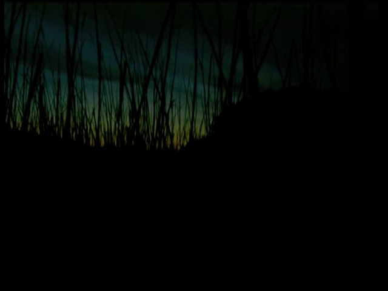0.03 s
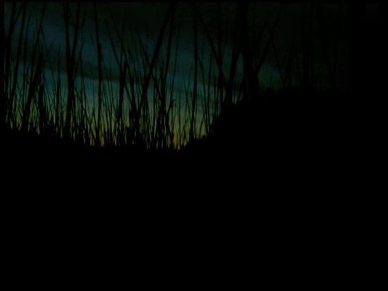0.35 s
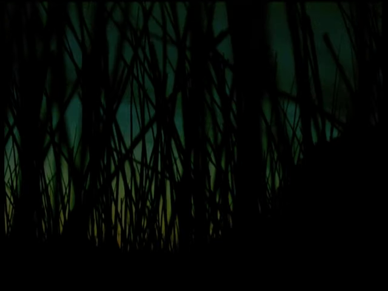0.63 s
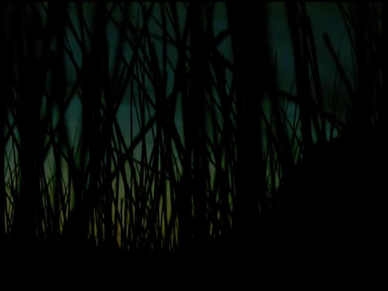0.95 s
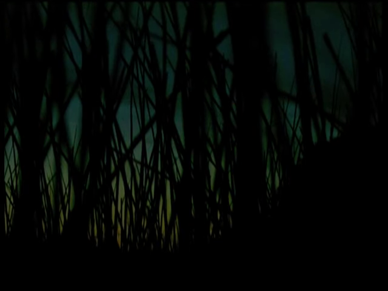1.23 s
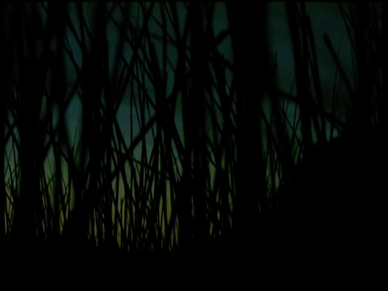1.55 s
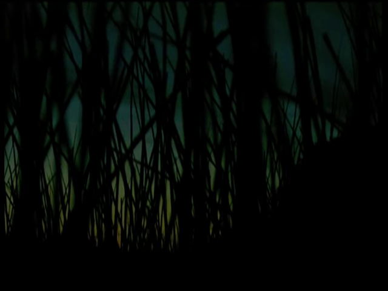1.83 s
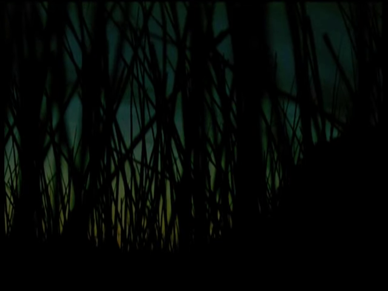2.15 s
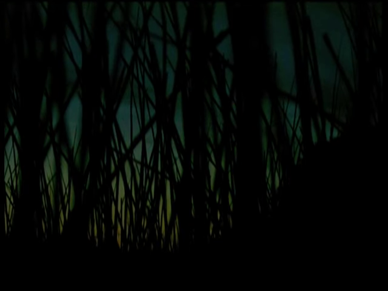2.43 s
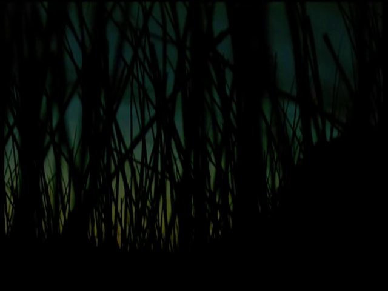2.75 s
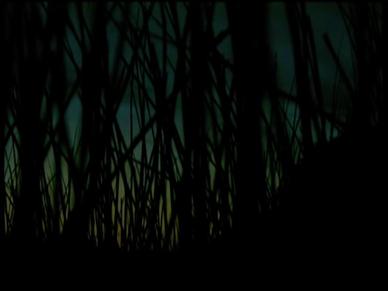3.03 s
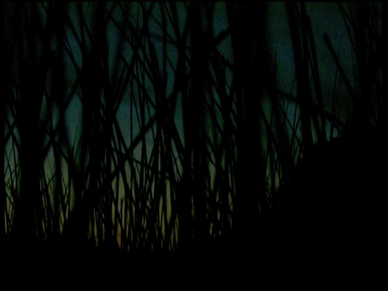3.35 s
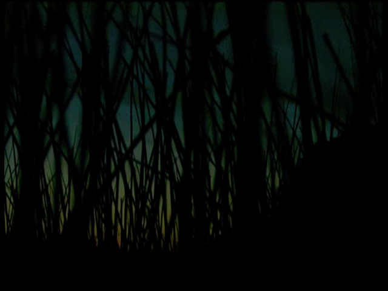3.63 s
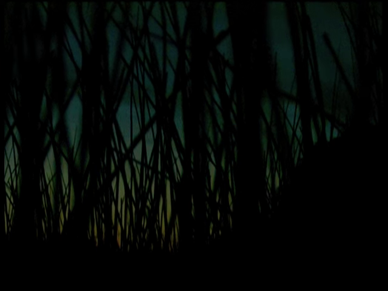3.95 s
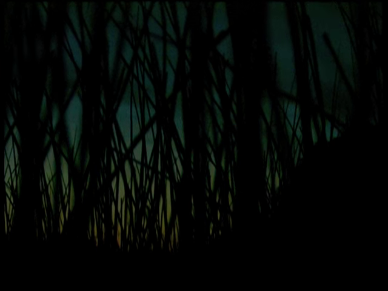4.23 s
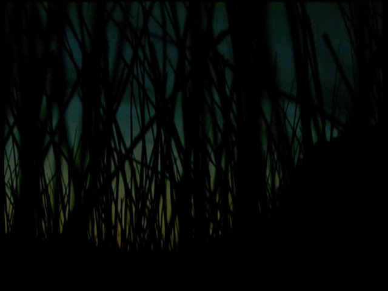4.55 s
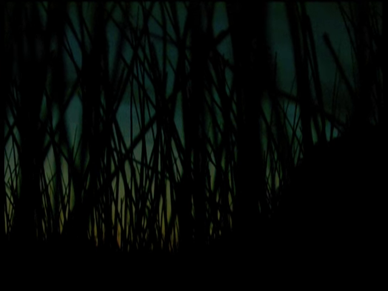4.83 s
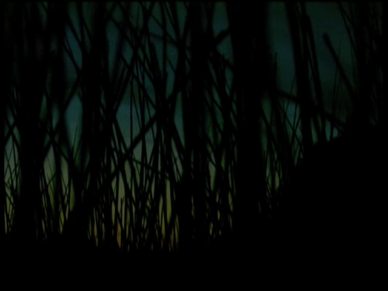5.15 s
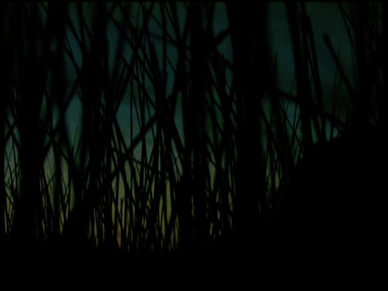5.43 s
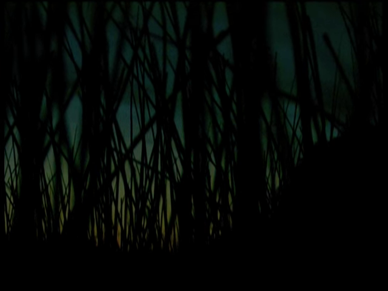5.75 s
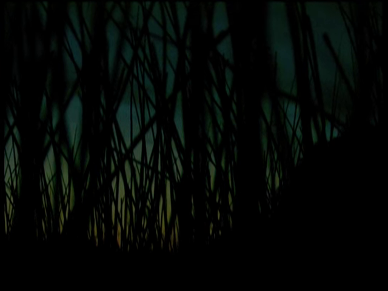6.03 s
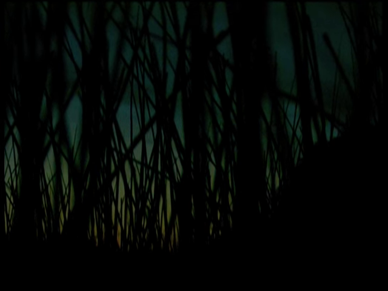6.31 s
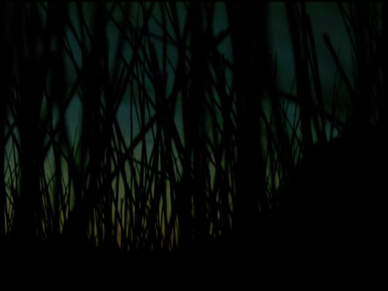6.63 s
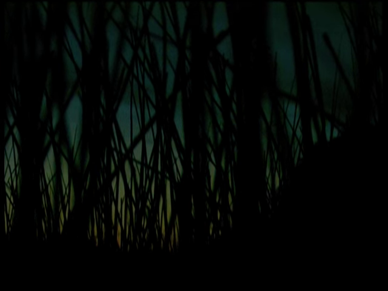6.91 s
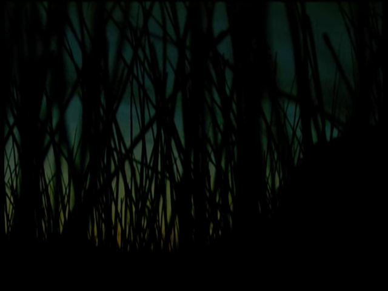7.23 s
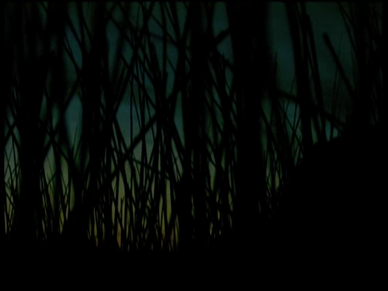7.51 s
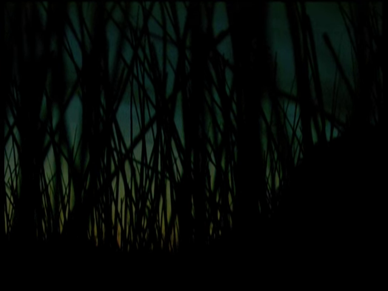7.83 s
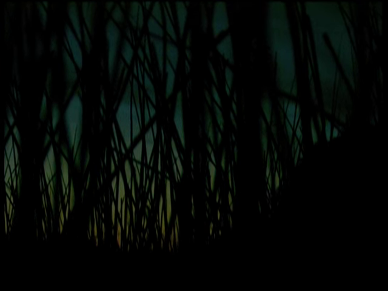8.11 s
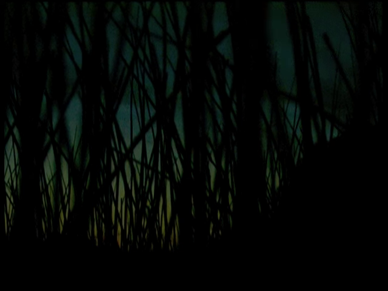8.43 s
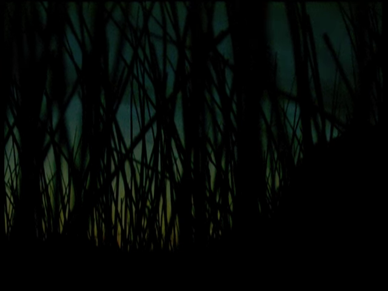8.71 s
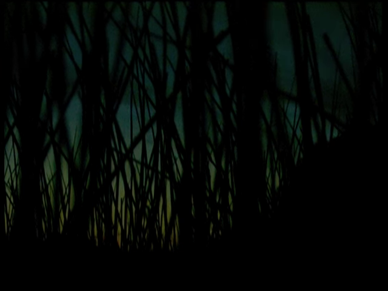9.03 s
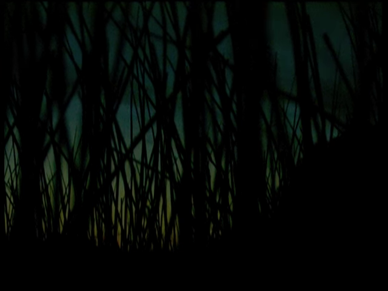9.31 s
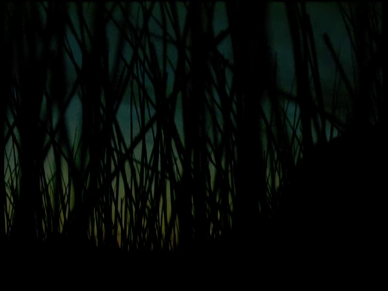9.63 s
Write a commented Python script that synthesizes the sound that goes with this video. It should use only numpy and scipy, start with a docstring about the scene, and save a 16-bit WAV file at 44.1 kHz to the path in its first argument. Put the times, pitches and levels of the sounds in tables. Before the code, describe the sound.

In a reed bed at dusk, a small warbler sings a high, fast, buzzing trill close to the microphone. It breaks off briefly after about a second, then restarts and runs on steadily. Far birds chirp and chatter faintly, a falling whistle comes twice, and a distant waterbird wails past the middle. A soft marsh hush and light hiss lie underneath, with nearly everything on the left.

```python
"""A reed bed at dusk, on the left channel: marsh hush, a fading rumble, recorder hiss, hum and whine.
At once a close warbler reels, 23 syllables a second, each a soft tick, an upward flick and a falling
note, scattered by the thicket. Far birds chirp, then chatter nasally. The warbler stops at 1.2 s and
restarts softly at 1.6 s. A far whistle slurs down at 2.8 s, a waterbird wails from 5.8 s to 7 s,
and the whistle returns at 7.7 s. The reel runs on to the end."""
import sys
import numpy as np
from scipy import signal
from scipy.fft import rfft, irfft, next_fast_len
from scipy.io import wavfile

SR = 44100
rng = np.random.default_rng(int(sys.argv[2]) if len(sys.argv) > 2 else 0)


def wav_record(signal):
    """Record a signal, one row per channel, as 16-bit PCM in the file named by sys.argv[1]."""
    frames = np.transpose(np.atleast_2d(signal))
    bounded = np.clip(frames, -1, 1)
    # unit amplitude maps onto the largest positive 16-bit level
    quanta = np.round(bounded * 32767).astype(np.int16)
    wavfile.write(sys.argv[1], SR, quanta)


N = 435266

# evening air: freq_hz, density_db
AIR_SPECTRUM = [(25, -5), (60, -7.5), (120, -9), (220, -2.5), (340, 2), (520, -7.5), (900, -10.5),
                (1700, -15), (3500, -17.5), (6000, -15.5), (9500, -27.5), (12000, -21), (16500, -21.5)]
# far rumble: freq_hz, density_db
RUMBLE_SPECTRUM = [(25, -12), (60, -31), (85, 4.5), (110, -16), (270, 0.5), (420, -28.5), (2000, -60)]
# its fade: time_s, level_db
RUMBLE_FADE = [(0, -58.5), (.25, -54), (.45, -62.5), (2, -62), (2.6, -65), (9.87, -80)]

# warbler bouts: start_s, end_s, from_rest_flag
BOUTS = [(0.0168, 1.24, 0), (1.603, 9.87, 1)]
# reel pace: time_s, syllables_per_s
TEMPO = [(0, 23.023), (1.2, 23.482), (2.4, 23.703), (3.8, 23.366), (4.3, 23.538), (5.3, 23.473),
         (7.5, 23.371), (8.8, 23.096), (9.05, 23.4)]
# tiny extra waits in the reel: time_s, extra_wait_s
EXTRA_WAITS = [(.45, .0004), (3.56, .002), (7.86, .0024)]
# reel loudness and pitch, both jump up near 0.44 s: time_s, flick_db, fall_db, pitch_hz
REEL_CONTOUR = [(.41, -17, -16, 5560), (.445, -10.8, -9, 5745), (1.23, -10.5, -10.4, 5697),
                (2.9, -11, -9.5, 5750), (3.7, -10, -9.6, 5730), (5.1, -10, -7.5, 5707),
                (7.5, -10, -7.5, 5688), (7.95, -10.5, -8.5, 5730), (8.4, -9.5, -9, 5695)]
# the three notes of a syllable: offset_ms, pitch_ratio, gain_db
TICK_SHAPE = [(-7, 0.14, -49), (-6.5, 0.27, -28), (-6, 0.45, -22), (-5.5, 0.65, -27.5), (-5.35, 0.89, -21),
              (-4, 0.917, -19.5), (-2.5, 1.38, -36)]
FLICK_SHAPE = [(-0.8439, 0.15, -27.5), (-0.5864, 0.23, -26.5), (-0.3042, 0.68, -20), (-0.23, 0.89, -11),
               (0, 0.9, -4.5), (0.4238, 1.126, 2), (0.99, 1.1535, -5), (1.72, 1.367, -13.5),
               (2.5, 1.507, -18), (3, 1.487, -24.5)]
FALL_SHAPE = [(12.3, 1.05, -56), (13.2, 1.0056, -13.5), (13.53, 1.022, -1.5), (14.7, 1.014, -0.1),
              (15.77, 0.984, -1.5), (16.48, 0.9416, -8.5), (19.33, 0.9004, -13.5), (21.1, 0.9, -37)]
# brief fixed reflections, probably in the microphone's dish: delay_ms, gain
EARLY_ECHOES = [(1.15, -0.035), (2.9, -0.091), (4.15, -0.00001)]
# thicket scatter, strongest in the treble: freq_hz, gain_db
THICKET_RESPONSE = [(1000, -5.5), (3500, -11.5), (5200, -13.5), (6100, -9.5), (7000, -2.5), (9000, -2.5),
                    (11000, -1.5), (13200, 1.5), (15000, -8)]

# far chirps: start_s, length_s, mid_pitch_hz, droop_ratio, level_db
CHIRPS = [(0.044, 0.077, 3020, 0.22, -50), (1.575, 0.067, 2850, 0.075, -54.5),
          (1.68, 0.077, 2890, 0.125, -56), (2.149, .07, 3430, -.04, -55), (3.689, 0.066, 2540, -0.011, -50),
          (3.733, 0.042, 2090, .1, -53), (3.916, .047, 2690, -0.025, -49), (4.143, 0.0406, 2650, 0, -47.5),
          (4.326, 0.048, 2050, 0.095, -53.5), (4.382, 0.032, 2400, 0.0024, -51),
          (4.445, 0.0265, 2400, .03, -48), (4.633, 0.025, 2350, 0.037, -47.5),
          (4.697, .033, 2410, .05, -48), (5.959, .041, 2750, 0.0042, -51), (7.11, .06, 3530, -0.0077, -51),
          (7.186, 0.031, 3300, -.28, -49), (9.407, 0.057, 2440, -.03, -50), (9.65, 0.056, 2880, .1, -50)]
# far chatter: start_s, end_s, level_db
CHATTER_SPELLS = [(0.665, 1.1, -56.5), (1.75, 2.35, -57.5), (3.194, 3.8, -56), (4.111, 5.6, -61.5),
                  (6.099, 7.65, -56), (8.459, 9.85, -56)]
# far nasal calls: start_s, length_s, start_hz, end_hz, level_db, jitter_ratio
NASAL_CALLS = [(1.447, .045, 734, 675, -52, .008), (1.508, 0.041, 730, 667, -54, .012),
               (8.005, 0.062, 802, 642.4, -45.5, 0.052), (8.76, 0.1, 736.3, 700, -56, .03),
               (9.44, 0.0673, 596.6, 567, -53, 0.037)]
# slurred whistle: offset_s, pitch_hz, gain_db
SLUR_SHAPE = [(0, 4400, 8), (.026, 3765, 1.5), (.055, 4130, -3), (.085, 3690, -2), (.11, 3200, -6),
              (.15, 2780, -12)]
# its entries: start_s, level_db
SLURS = [(2.752, -40.5), (7.695, -39.5)]
# waterbird notes: start_s, length_s, mid_pitch_hz, droop_ratio, arch_ratio, level_db, rough_ratio
WAILS = [(5.8, 0.0815, 502, -0.123, .03, -46.5, 0.71), (5.84, .2, 958, .15, .03, -44.5, 1),
         (5.99, 0.158, 1006, .04, 0.099, -41.5, 0.4), (6.13, 0.24, 750, .04, 0, -52, .45),
         (6.3, 0.26, 708.5, .05, .01, -43, .12), (6.618, .16, 680, 0, 0.0298, -48.5, .25),
         (6.76, 0.1, 521, .18, -.1, -56, 0.45), (6.87, 0.16, 694, -.14, 0.078, -46, 0.24)]

# microphone colour: freq_hz, gain_db
MIC_RESPONSE = [(30, 1), (100, -0.5), (800, 0), (1250, 2.5), (1700, -1), (2200, 1.5), (2800, 1.5),
                (3400, -1), (4100, 1), (6500, 0), (8800, 0), (9600, -2.5), (11500, -3.5), (13200, 0),
                (15000, 2)]
# recorder hiss: freq_hz, density_db
HISS_SPECTRUM = [(25, 12), (150, -3), (1000, -1.5), (8000, -3), (12000, -1), (13400, 3.5), (14500, -5),
                 (16500, -27)]
# recorder hum and whine: freq_hz, width_hz, left_db, right_db
RECORDER_TONES = [(149.8, 2, -66.5, -100), (13248, 300, -77, -86), (13571, 300, -80, -90),
                  (15622, 25, -80, -78), (15622, 160, -83, -82)]


def gain_of(db):
    """Decibels to amplitude."""
    return 10 ** (np.asarray(db) / 20)


def unit_rms(x):
    """Scales to rms 1."""
    return x / np.sqrt(np.mean(x ** 2) + 1e-20)


def add(mix, start_s, sound):
    """Mixes a sound in at start_s."""
    part = mix[max(round(start_s * SR), 0):][:len(sound)]
    part += sound[:len(part)]


def coloured(x, response):
    """Filters by a table of freq_hz, gain_db."""
    hz, db = np.transpose(response)
    size = next_fast_len(N, True)
    bins_hz = np.fft.rfftfreq(size, 1 / SR)
    gain = gain_of(np.interp(np.log(bins_hz + 1), np.log(hz), db))
    return irfft(rfft(x, size) * gain, size)[..., :N]


def noise(spectrum):
    """Steady coloured noise, rms 1."""
    return unit_rms(coloured(rng.standard_normal(N), spectrum))


def drift(size, width_hz):
    """Random wander up to about width_hz, rms 1."""
    steps = np.arange(size) * 2 * width_hz / SR
    count = int(steps[-1]) + 2
    return unit_rms(np.interp(steps, np.arange(count), rng.standard_normal(size)[:count]))


def phase_of(hz):
    """Running phase of a pitch curve."""
    return 2 * np.pi * np.cumsum(hz) / SR


def air(hush_db=-54.5):
    """Steady marsh hush over a far, fading rumble."""
    rumble_db = np.interp(np.arange(N) / SR, *np.transpose(RUMBLE_FADE))
    return gain_of(hush_db) * noise(AIR_SPECTRUM) + gain_of(rumble_db) * noise(RUMBLE_SPECTRUM)


def syllable_times(start_s, end_s, from_rest, hurry_per_s=1.711, settle_s=0.14, wait_width_s=0.05):
    """Reel timing: too fast from rest, then settled, with tiny extra waits."""
    times_s = [start_s]
    while times_s[-1] < end_s:
        now_s = times_s[-1]
        rate_per_s = np.interp(now_s, *np.transpose(TEMPO))
        rate_per_s += from_rest * hurry_per_s * np.exp((start_s - now_s) / settle_s)
        wait_s = sum(extra_s * np.exp(-np.square((now_s - at_s) / wait_width_s))
                     for at_s, extra_s in EXTRA_WAITS)
        times_s.append(now_s + 1 / rate_per_s + wait_s)
    return times_s[:-1]


def note(shape, at_s, pitch_hz, level_db, octave_db):
    """Swept whistle with a weak octave; returns start_s, sound."""
    offset_ms, pitch_ratio, gain_db = np.transpose(shape)
    knots_s = offset_ms / 1000
    t = np.arange(knots_s[0], knots_s[-1], 1 / SR)
    phase = phase_of(pitch_hz * np.interp(t, knots_s, pitch_ratio))
    envelope = gain_of(level_db + np.interp(t, knots_s, gain_db)) * signal.windows.tukey(len(t), 0.12)
    return at_s + knots_s[0], envelope * (np.sin(phase) + gain_of(octave_db) * np.sin(2 * phase))


def warbler(spread_ratio=0.0052, spread_db=0.8977, tick_gain_db=-0.1, tick_spread_db=1.4, slip_s=0.00018,
            flick_cold_db=-16.5, flick_warm_s=0.096, cold_lift_ratio=0.15,
            fall_cold_db=-12.5, fall_warm_s=0.27):
    """Tick, flick, fall, no two alike. From rest the notes start soft, the flicks also higher."""
    song = np.zeros(N)
    knots_s, *contour = np.transpose(REEL_CONTOUR)
    for start_s, end_s, from_rest in BOUTS:
        for at_s in syllable_times(start_s, end_s, from_rest):
            flick_db, fall_db, pitch_hz = (np.interp(at_s, knots_s, column) for column in contour)
            cold = from_rest * np.exp((start_s - at_s) / flick_warm_s)
            flick_db += flick_cold_db * cold
            fall_db += fall_cold_db * from_rest * np.exp((start_s - at_s) / fall_warm_s)
            slip, bend, push = rng.standard_normal((3, 3))
            tick_s, flick_s, fall_s = at_s + slip_s * slip * [1, 0.5, 1]
            tick_hz, flick_hz, fall_hz = pitch_hz * (1 + spread_ratio * bend)
            flick_hz *= 1 + cold_lift_ratio * cold
            tick_db = flick_db + tick_gain_db + tick_spread_db * push[0]
            flick_db += spread_db * push[1]
            fall_db += spread_db * push[2]
            add(song, *note(TICK_SHAPE, tick_s, tick_hz, tick_db, octave_db=-32.5))
            add(song, *note(FLICK_SHAPE, flick_s, flick_hz, flick_db, octave_db=-33.5))
            add(song, *note(FALL_SHAPE, fall_s, fall_hz, fall_db, octave_db=-38.5))
    return song


def scatter(x, t60_s, delay_s):
    """Many weak, decaying echoes of random sign."""
    t = np.arange(SR) / SR
    taps = rng.choice([-1, 0, 0, 0, 0, 1], SR) * gain_of(-60 * t / t60_s)
    taps = taps[:int(t60_s * SR)]
    impulse_response = np.r_[np.zeros(int(delay_s * SR)), taps / np.linalg.norm(taps)]
    return signal.oaconvolve(x, impulse_response)[:N]


def reflections(song, bed_db=-20, marsh_db=-28):
    """Direct song, early echoes, and returns from thicket, reed bed and wider marsh."""
    heard = song.copy()
    for delay_ms, gain in EARLY_ECHOES:
        add(heard, delay_ms / 1000, gain * song)
    heard += scatter(coloured(song, THICKET_RESPONSE), t60_s=0.048, delay_s=0.001109)
    heard += gain_of(bed_db) * scatter(song, t60_s=0.23, delay_s=0.0065)
    return heard + gain_of(marsh_db) * scatter(song, t60_s=0.29, delay_s=0.076)


def arch(length_s, mid_hz, droop_ratio, arch_ratio):
    """Pitch curve: a parabola on a slope; positive droop falls."""
    u = np.linspace(-1, 1, int(length_s * SR))
    return mid_hz * (1 - arch_ratio * u ** 2 - droop_ratio * u / 2)


def whistle(hz, level_db, waver_ratio=0.018, waver_hz=260, flutter_db=2.5):
    """Near-pure note, slightly shaky in pitch and level."""
    size = len(hz)
    envelope = gain_of(level_db + flutter_db * drift(size, waver_hz)) * signal.windows.tukey(size, 0.4)
    return envelope * np.sin(phase_of(hz * (1 + waver_ratio * drift(size, waver_hz))))


def chirps(arch_per_s=2.0):
    """Short far whistles; longer ones arch higher."""
    calls = np.zeros(N)
    for start_s, length_s, mid_hz, droop_ratio, level_db in CHIRPS:
        hz = arch(length_s, mid_hz, droop_ratio, arch_per_s * length_s)
        add(calls, start_s, whistle(hz, level_db))
    return calls


def chatter_notes(rate_per_s=16, low_hz=550, high_hz=1500, spread_db=5.5, glide_ratio=0.3,
                  jitter_ratio=0.048):
    """Spells of scratchy notes, random in pitch and glide; rows as in NASAL_CALLS."""
    notes = []
    for start_s, end_s, level_db in CHATTER_SPELLS:
        for at_s in np.arange(start_s, end_s, 1 / rate_per_s):
            late, stretch, height, glide, push = rng.uniform(-1, 1, 5)
            length_s = 0.043 + 0.0176 * stretch
            start_hz = np.sqrt(low_hz * high_hz * (high_hz / low_hz) ** height)
            end_hz = start_hz * (1 + glide_ratio * glide)
            note_db = level_db + spread_db * push
            notes.append((at_s + 0.02 * late, length_s, start_hz, end_hz, note_db, jitter_ratio))
    return notes


def nasal_calls(notes, throat_hz=3150, throat_width_hz=1250, jitter_hz=408.4):
    """Nine jittery harmonics through one broad throat resonance."""
    calls = np.zeros(N)
    harmonics = np.arange(1, 10)[:, None]
    for start_s, length_s, start_hz, end_hz, level_db, jitter_ratio in notes:
        hz = np.linspace(start_hz, end_hz, int(length_s * SR))
        phase = phase_of(hz * (1 + jitter_ratio * drift(len(hz), jitter_hz)))
        throat = np.exp(-((harmonics * hz - throat_hz) / throat_width_hz) ** 4)
        offsets_rad = 2 * np.pi * rng.random(harmonics.shape)
        voice = (throat * np.sin(harmonics * phase + offsets_rad)).sum(0)
        add(calls, start_s, gain_of(level_db) * unit_rms(voice) * signal.windows.tukey(len(hz), 0.4))
    return calls


def slurs():
    """A far whistle dips, rises and slides away."""
    calls = np.zeros(N)
    knots_s, pitch_hz, gain_db = np.transpose(SLUR_SHAPE)
    t = np.arange(0, knots_s[-1], 1 / SR)
    hz = np.interp(t, knots_s, pitch_hz)
    for start_s, level_db in SLURS:
        add(calls, start_s, whistle(hz, level_db + np.interp(t, knots_s, gain_db)))
    return calls


def waterbird(rasp_hz=330, waver_ratio=0.0086, waver_hz=16, tremble_db=0.9, dry_db=-2.0, wet_db=-8.0):
    """Hoarse opening notes clear into lower, unsteady wails that echo over the marsh."""
    call = np.zeros(N)
    for start_s, length_s, mid_hz, droop_ratio, arch_ratio, level_db, rough_ratio in WAILS:
        hz = arch(length_s, mid_hz, droop_ratio, arch_ratio)
        size = len(hz)
        phase = phase_of(hz * (1 + waver_ratio * drift(size, waver_hz)))
        hoarse = drift(size, rasp_hz) * np.sin(phase) + drift(size, rasp_hz) * np.cos(phase)
        voice = np.sqrt(1 - rough_ratio ** 2) * unit_rms(np.sin(phase)) + rough_ratio * hoarse
        gain = gain_of(level_db + tremble_db * drift(size, waver_hz))
        add(call, start_s, gain * signal.windows.tukey(size, 0.55) * voice)
    return gain_of(dry_db) * call + gain_of(wet_db) * scatter(call, t60_s=2.2, delay_s=0.04)


def scene(far_echo_db=-11, leak_db=-52):
    """One directional microphone on the left; a trace leaks to the right."""
    reel = reflections(warbler())
    far_birds = chirps() + slurs() + nasal_calls(NASAL_CALLS + chatter_notes())
    far_echo = gain_of(far_echo_db) * scatter(far_birds, t60_s=0.12, delay_s=0.02)
    marsh = reel + far_birds + far_echo + waterbird() + air()
    return np.array([marsh, gain_of(leak_db) * marsh])


def record(dry, hiss_db=-67.5, wander_rad=0.66, cutoff_hz=16400):
    """Microphone colour, then the recorder's hiss, hum, whine and low-pass."""
    hiss = gain_of(hiss_db) * np.array([noise(HISS_SPECTRUM), noise(HISS_SPECTRUM)])
    out = coloured(dry, MIC_RESPONSE) + hiss
    for freq_hz, width_hz, left_db, right_db in RECORDER_TONES:
        phase = phase_of(np.full(N, freq_hz)) + wander_rad * drift(N, width_hz)
        out += gain_of([[left_db], [right_db]]) * unit_rms(np.sin(phase))
    lowpass = signal.firwin(255, cutoff_hz, window=("kaiser", 9), fs=SR)
    return signal.oaconvolve(out, lowpass[None], "same")


dry = scene()
out = record(dry)
wav_record(out)
```